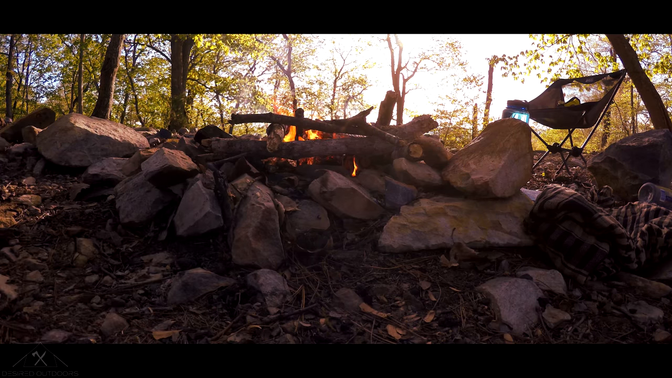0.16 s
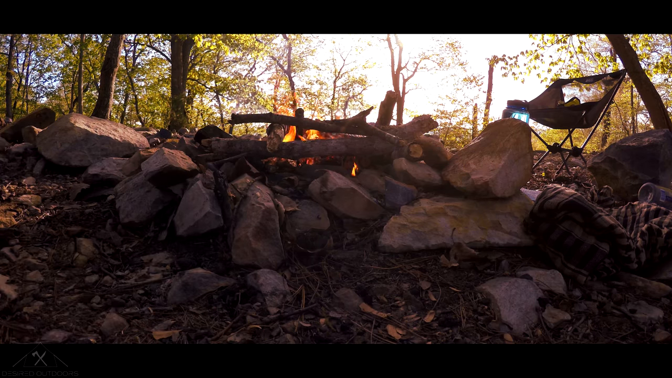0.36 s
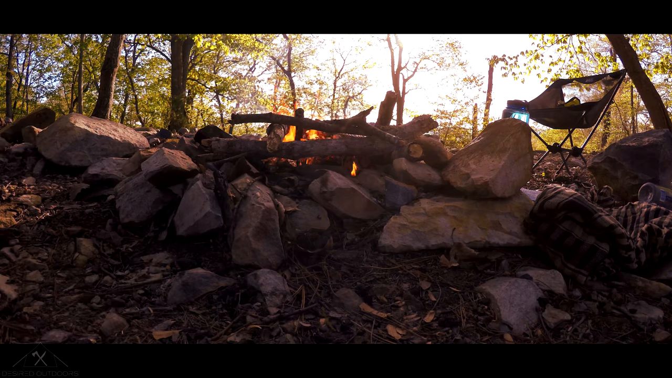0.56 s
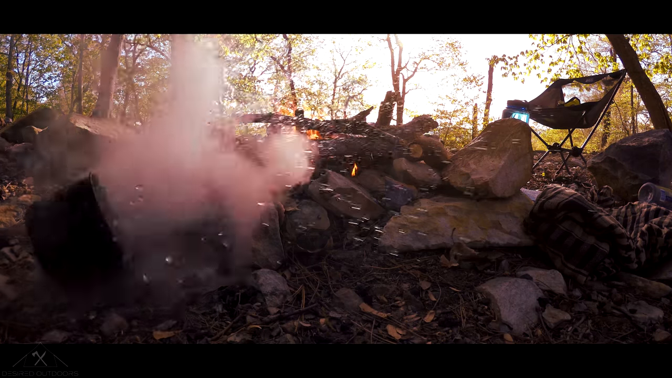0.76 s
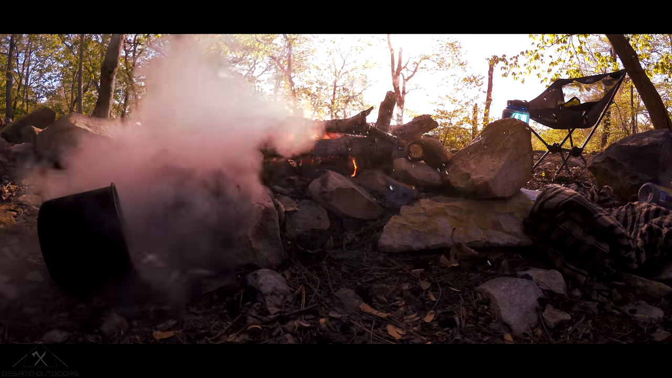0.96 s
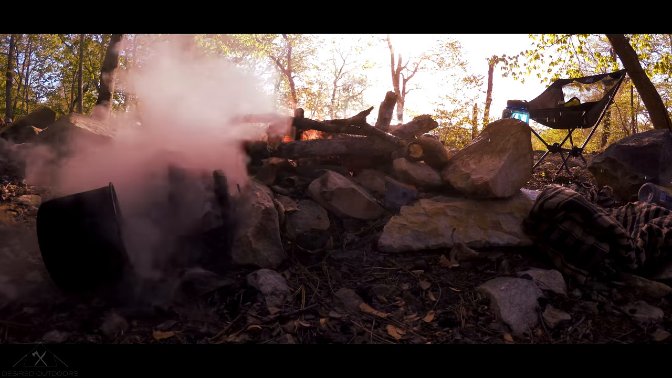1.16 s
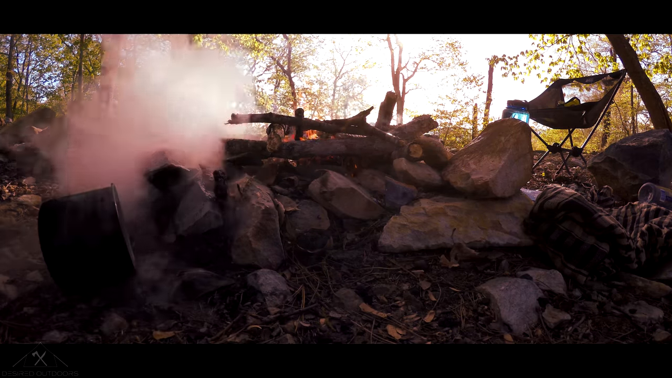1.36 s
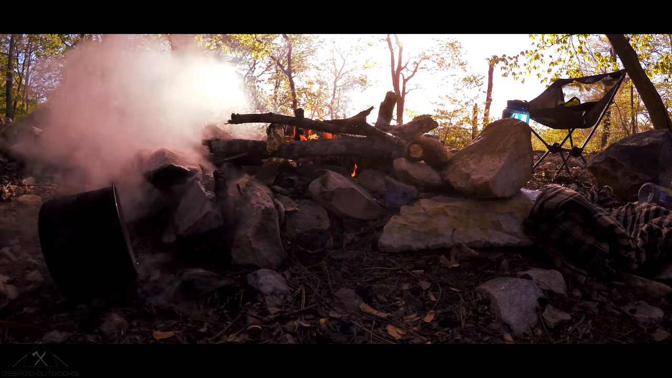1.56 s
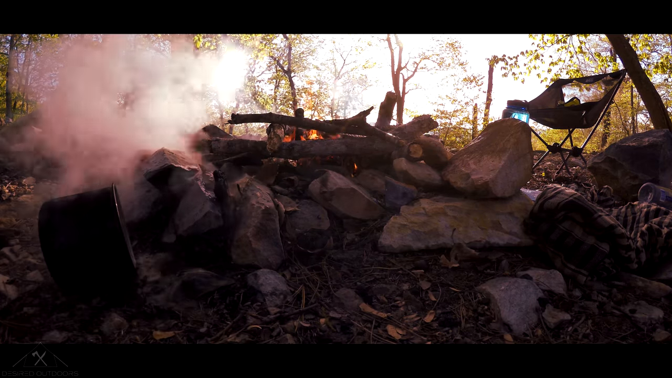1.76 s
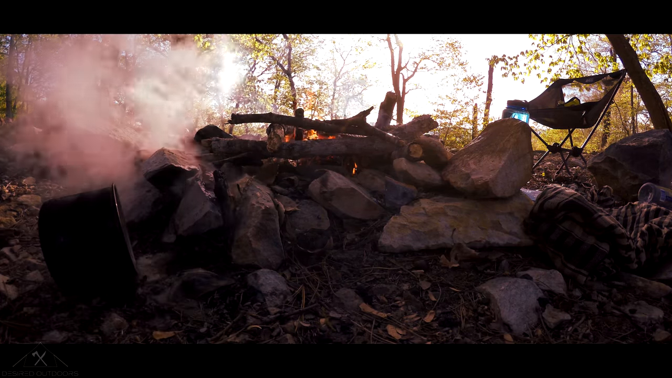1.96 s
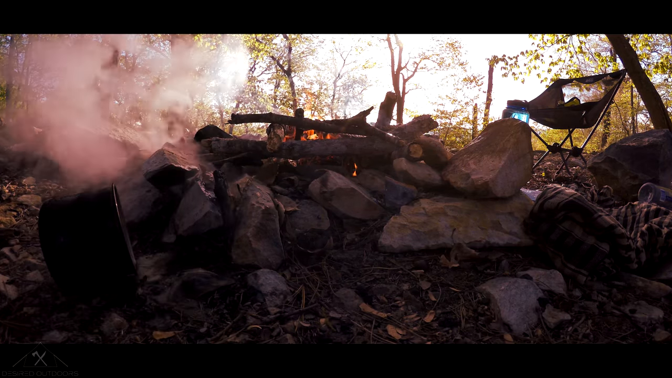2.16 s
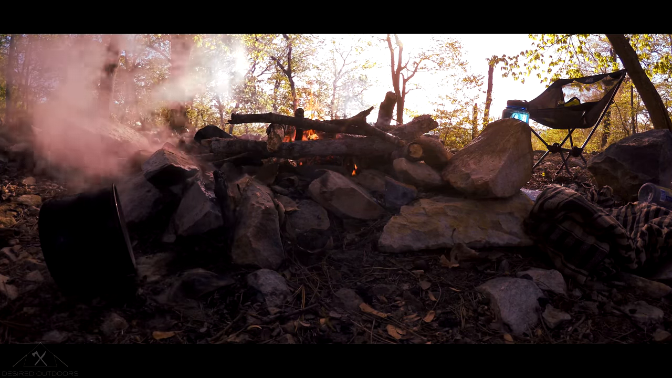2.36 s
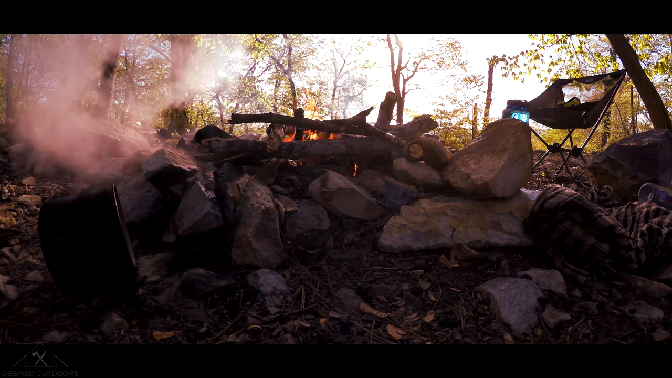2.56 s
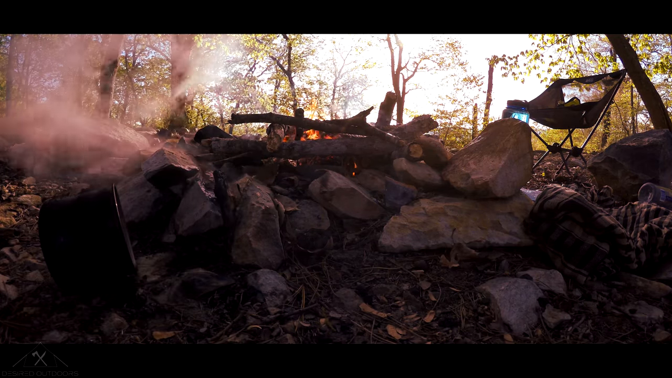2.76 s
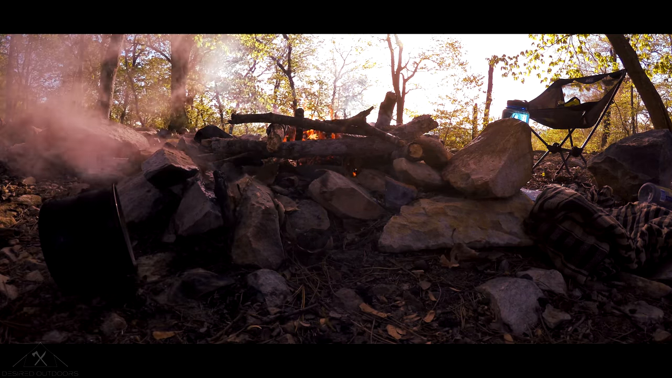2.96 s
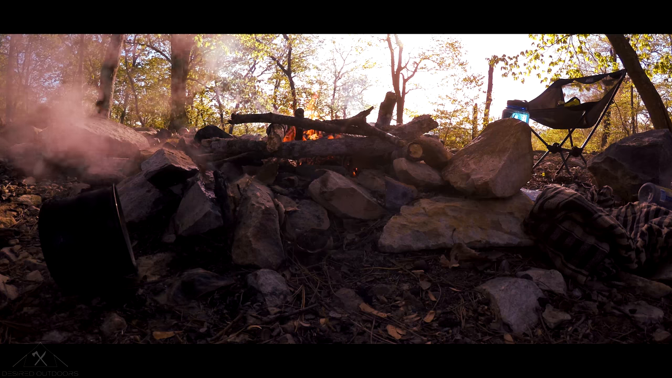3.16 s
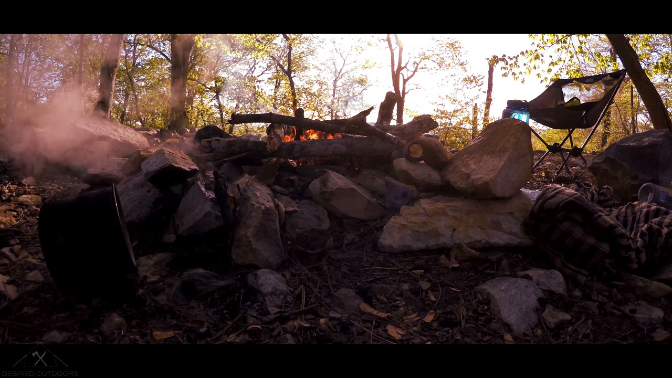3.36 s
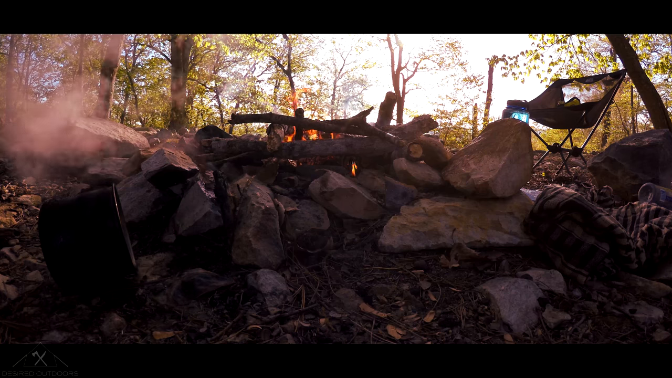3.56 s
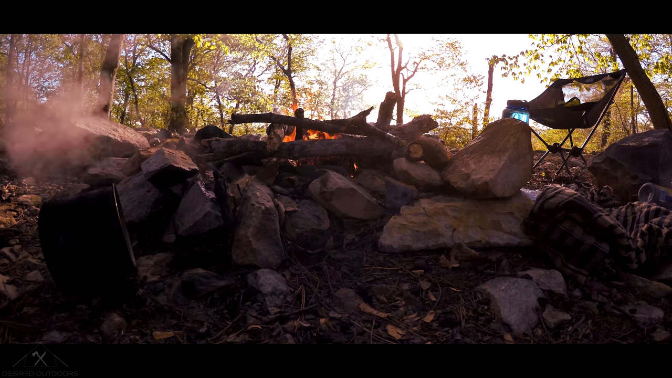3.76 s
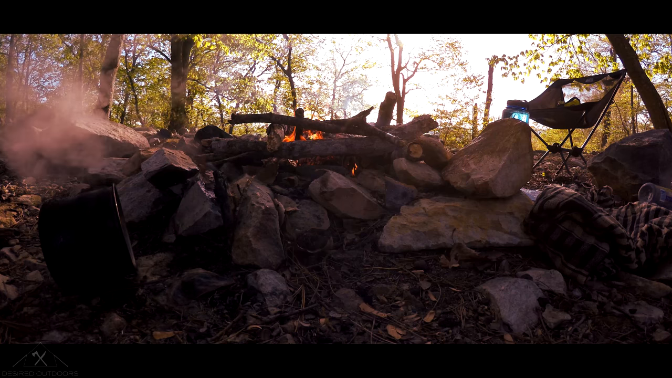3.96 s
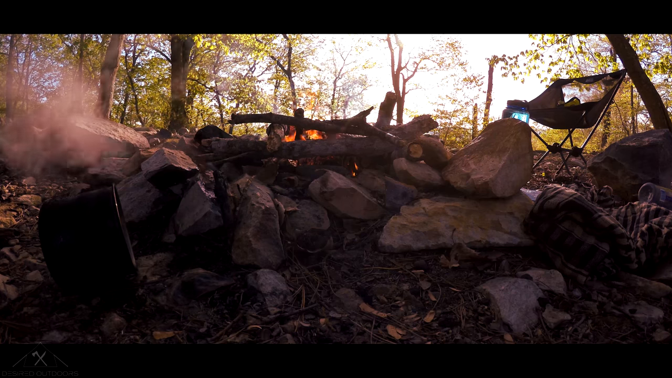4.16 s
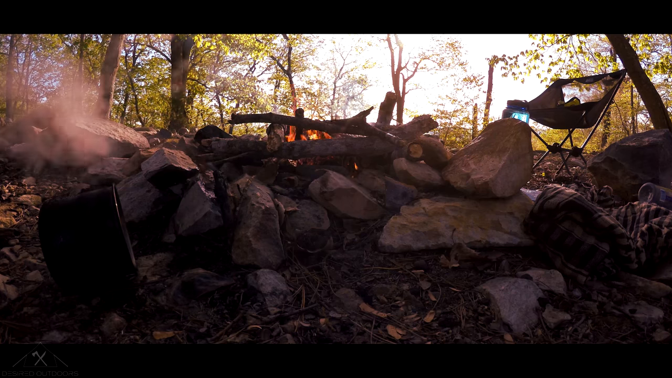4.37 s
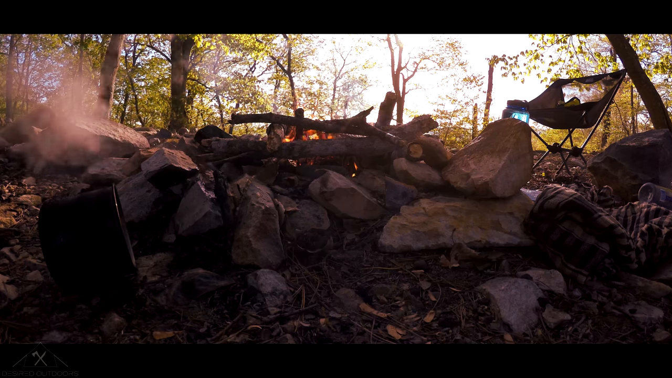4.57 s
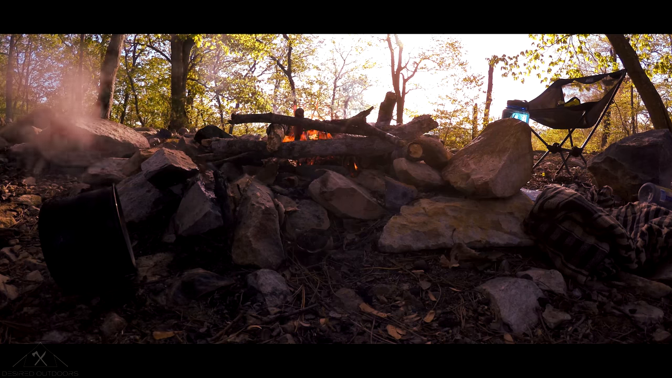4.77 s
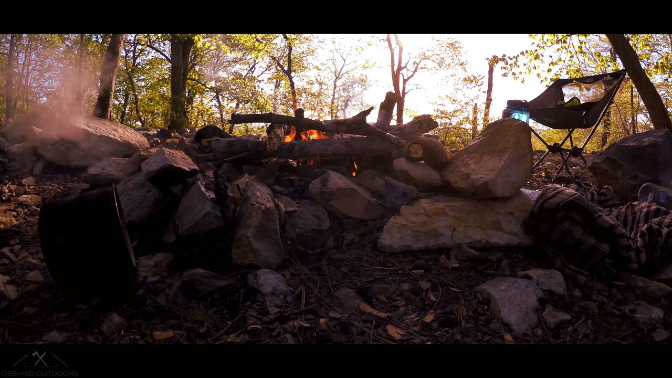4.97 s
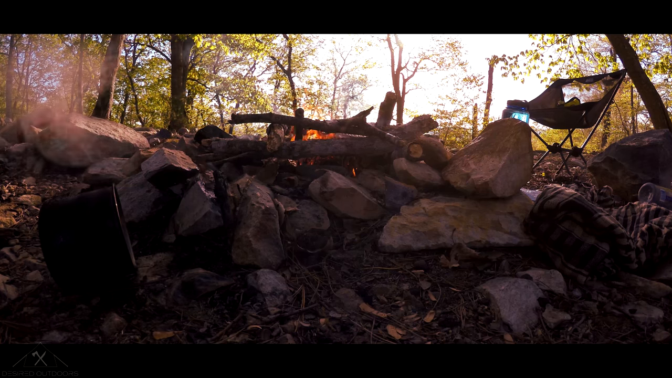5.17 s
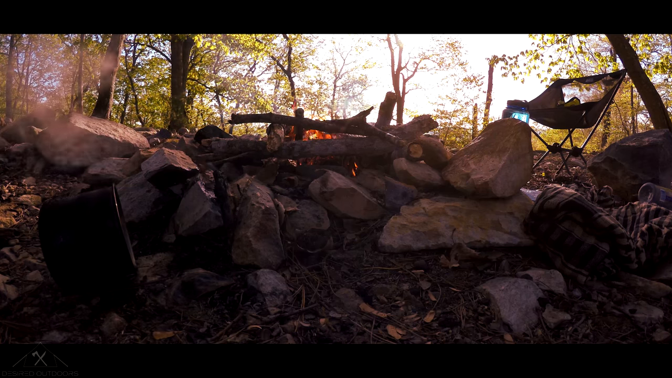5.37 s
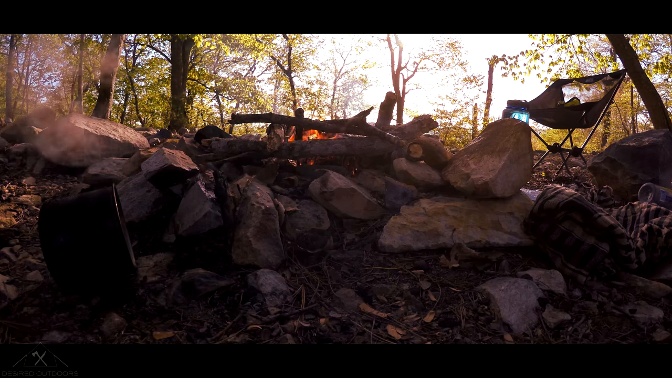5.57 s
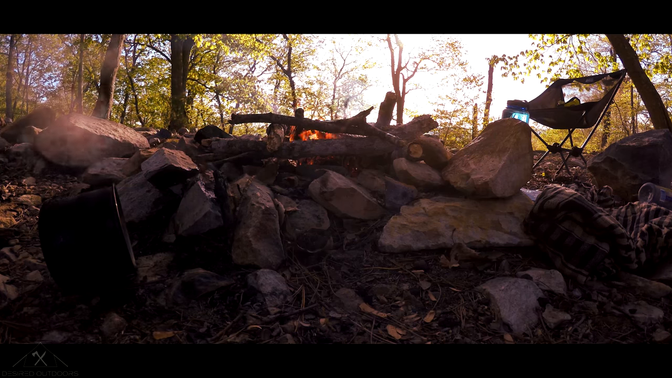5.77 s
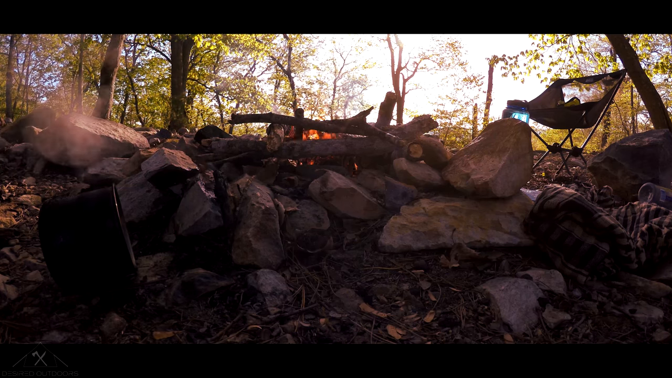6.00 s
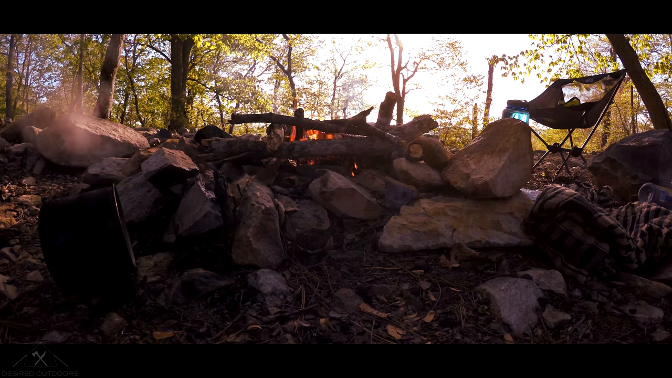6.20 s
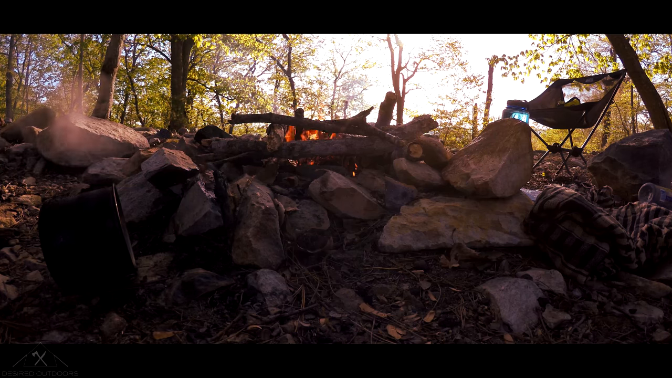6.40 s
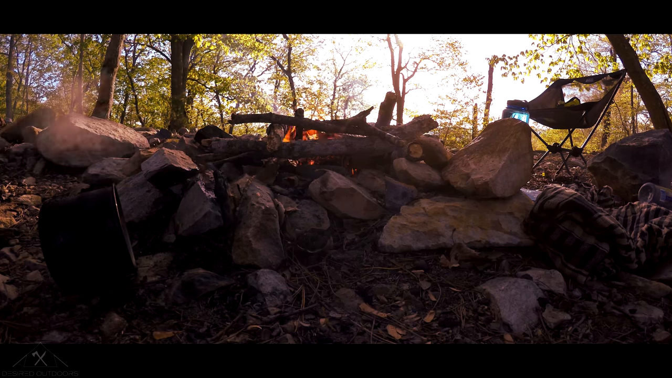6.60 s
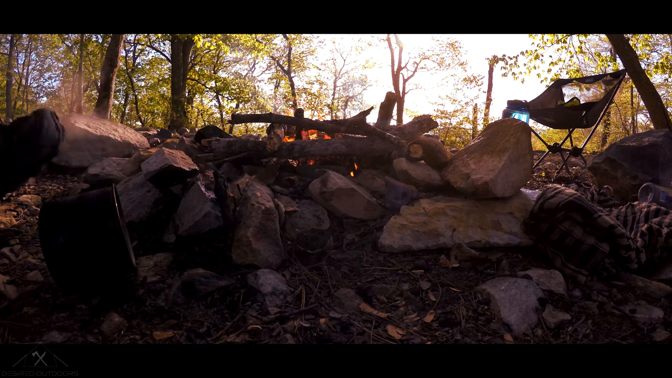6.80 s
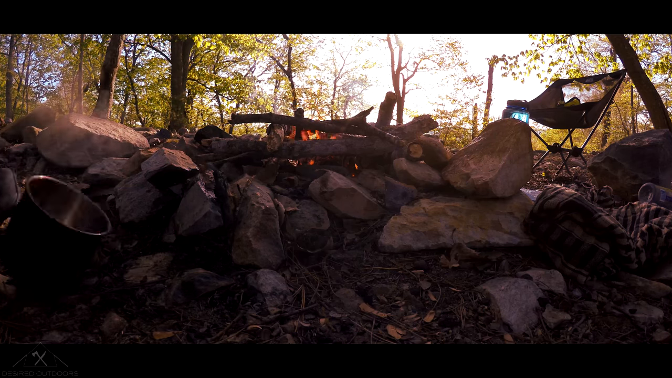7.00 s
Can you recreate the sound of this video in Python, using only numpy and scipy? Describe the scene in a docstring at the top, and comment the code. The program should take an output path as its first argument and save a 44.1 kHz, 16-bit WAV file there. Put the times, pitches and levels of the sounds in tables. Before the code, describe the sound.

Water spills onto hot campfire coals with a rising, spitting hiss, and a metal pot hits stone with one loud, dull crack. Steam sizzles on in ever weaker surges as the water sloshes inside the pot. Then the fire ticks softly, wood knocks, and the pot scrapes briefly on stony ground. The sounds are close, outdoors in the woods, over faint birds and a far traffic rumble.

```python
"""At a campfire in the woods, a pot of water slips. Water runs over the rim and flashes to steam on the coals,
then the pot cracks onto the ring of stones and rings in its damped modes. The water sloshes on, wetting
the hot wall in ever weaker bursts of sizzle: steam noise and the puffs of bursting droplets. The fire
ticks, wood knocks, leaves rustle, and at the end the pot is tipped and grates over the stony ground.
Behind it all are gusts of wind, far traffic, a droning engine and faint birds."""
import sys
import numpy as np
from scipy import signal
from scipy.fft import rfft, irfft
from scipy.io import wavfile
from scipy.ndimage import map_coordinates

SR = 44100
rng = np.random.default_rng(int(sys.argv[2]) if len(sys.argv) > 2 else 0)


def dump_mix(stems):
    """Bounce the given channels to the path in sys.argv[1] as a 16-bit WAV at rate SR."""
    frames = np.atleast_2d(stems).T  # one column per channel
    limited = np.clip(frames, -1, 1)  # hard clip at full scale
    pcm = np.round(limited * 32767).astype(np.int16)
    wavfile.write(sys.argv[1], SR, pcm)


N = 310464
TIME = np.arange(N) / SR

# Water running over the rim onto the coals. Each row: time in seconds, flow level in dB.
POURING = [(0.3, -54.5), (0.35, -44.5), (0.40, -37), (0.47, -34), (0.52, -36), (0.68, -31.5), (0.76, -36),
           (0.85, -38), (0.91, -73)]
# Swings of the water against the hot wall.
# Each row: start in seconds, time on the wall in seconds, flow level in dB, drying in dB per second.
SLOSHES = [(0.958, 0.26, -39, 68), (1.39, 0.26, -40, 160), (1.819, 0.26, -41.6, 180),
           (2.266, 0.24, -43, 220.5), (2.712, 0.21, -45, 223), (3.157, 0.19, -48, 300),
           (3.626, 0.15, -50.5, 340)]
# The state of the boil. Each row: time in seconds, puffs per second, their level in dB relative to
# the steady steam, share from 0 to 1 that boils inside the pot.
BOILING = [(0.3, 2500, -5, 0.03), (1.25, 1240, -3, 0), (1.6, 330, -5, 0.29), (2.4, 310, -1, 0.66),
           (2.8, 400, -7, 0.94), (3.8, 530, -11, 1)]
# Air resonances of the open pot. Each row: frequency in Hz, bandwidth in Hz, gain in dB.
POT_AIR = [(687, 76, 4), (794.8, 37, 3), (910, 14, 0.5), (980, 22, -5.5), (2550, 110, 2), (2880, 65, -0.5),
           (3880, 99, -1.5), (4230, 130, 3), (5700, 77, 2), (6420, 380, 1), (7596, 180, 4.5),
           (8650, 420, 4), (9260, 180, 2), (12743, 1400, -7.5)]
# Reflections off the pot wall and the stones. Each row: delay in seconds, gain as a factor.
ECHOES = [(0.00165, 0.2), (0.0031, -0.17), (0.0054, 0.2)]
# Spectra of steam on the coals, steam in the pot and water hitting the ground.
# Each row: frequency in Hz, relative level in dB.
COAL_STEAM = [(240, -27), (450, -4), (700, 3.5), (950, 1.5), (1300, -7.5), (1700, -2.5), (2400, -3),
              (3000, 0), (4000, -2), (5000, -1.5), (5900, -1.5), (8800, -5.5), (10500, -9.5),
              (15000, -14.5)]
POT_STEAM = [(300, -22), (480, -7.5), (1000, -8), (1200, -22), (1800, -14.5), (2200, -18.5), (2500, -7.5),
             (4000, -3.5), (5000, -3.5), (6000, -2), (9600, -2.5), (10800, -6.5), (13200, -3), (15000, -10)]
SPLASH_SPECTRUM = [(70, -16), (160, 2), (300, 1), (480, -1), (900, -21.5)]
# The first gush turning to spray. One row: centre in seconds, half-width in seconds, level in dB.
FLASH = (0.474, 0.014, -28.5)
# Big drops bursting on hot metal. Each row: start in seconds, relative level in dB.
SPITS = [(0.425, -20), (0.4676, -15.5), (0.472, -12.5), (0.5793, -17), (0.8625, -19), (0.903, -18),
         (0.985, -20.5), (1.2191, -19.5), (1.4132, -18), (1.4216, -18), (1.4422, -23), (1.6132, -17),
         (1.635, -23), (1.892, -18.5), (2.0337, -17), (2.0518, -24), (2.443, -25.5), (2.4872, -23),
         (2.9158, -33), (3.3314, -29)]
# Gulps plopping onto the coals. Each row: start in seconds, relative level in dB, starting pitch in Hz.
GULPS = [(0.428, -32.5, 1207), (0.462, -29.5, 959.6), (0.474, -26, 1005), (0.495, -27, 918.5),
         (0.544, -27.5, 612), (0.580, -26, 518), (0.615, -27.5, 831.6), (0.644, -28, 880),
         (0.665, -29.5, 1073), (0.795, -32, 1020), (0.862, -30.5, 850)]
# Larger spills slapping the ground. Each row: loudest moment in seconds, level in dB.
SPILLS = [(0.575, -46), (1.21, -44)]
# The first trickle singing on the embers. Each row: time in seconds, level in dB.
TRICKLE_LEVEL = [(0, -61), (0.07, -55), (0.13, -60), (0.2, -52), (0.32, -50.5), (0.42, -50), (0.55, -91)]
# Resonances of its steam jet. Each row: frequency in Hz, bandwidth in Hz, gain in dB.
TRICKLE_PEAKS = [(1250, 280, -0.5), (2700, 190, -6), (4530, 220, -9.5), (5100, 400, -6), (5870, 160, -1),
                 (7255, 380, -9)]
# Steam squeaking through a crack.
# Each row: start and length in seconds, first and last pitch in Hz, level in dB.
SQUEAKS = [(0.018, 0.022, 5040, 5850, -55.5), (0.057, 0.02, 6900, 7670, -52),
           (0.116, 0.034, 5100, 6010, -53.5), (0.158, 0.024, 6950, 8010, -50.5),
           (0.218, 0.024, 5390, 5900, -51), (0.262, 0.018, 7250, 7950, -49.5),
           (0.825, 0.035, 3300, 3150, -38), (3.4, 0.22, 6100, 6450, -70), (3.41, 0.21, 7900, 7970, -68)]

# Blows of the pot on stone. Each row: start in seconds, relative levels of clash, thud and ring in dB.
LANDING_BLOWS = [(0.7109, -4.5, -12, -12), (0.7162, -11, 4.5, -16.5), (0.7184, -14, -14, -23),
                 (0.7405, -23.5, -43, -42)]
# Jerks of the pot over the ground. Each row: start in seconds, relative levels of grit and bump in dB.
DRAG_JERKS = [(6.9405, -45, -35.5), (6.9435, -45, -54), (6.956, -38.5, -53), (6.9765, -46, -53),
              (6.9885, -43, -60), (7.001, -58, -44.5), (7.0065, -47, -57), (7.019, -46, -53),
              (7.03, -51, -41)]
# Spectra of the rim's clash, the body's thud and the grit. Each row: frequency in Hz, relative level in dB.
CLASH_SPECTRUM = [(180, -35.5), (300, -0.5), (1040, -8), (2650, -23), (3490, -6), (4120, -9), (4770, 0),
                  (7420, -6.5), (8460, -5.5), (11900, -8), (15000, -18.5)]
THUD_SPECTRUM = [(40, -8), (120, -9.5), (170, 1), (270, 5.5), (450, -2), (750, 0.5), (1050, -5),
                 (1400, -24), (2000, -1), (2450, -2.5), (3200, -19.5), (8000, -33.5)]
GRIT_SPECTRUM = [(710, -44.5), (1200, -5.5), (2240, -8), (2510, -9), (4000, -8), (4310, -9), (4790, -5),
                 (7010, -3.5), (15000, -3.5)]
# Modes of the pot, of the yielding soil and of a dull bump before the pot is tipped.
# Each row: frequency in Hz, relative level in dB, time to fall 60 dB in seconds.
POT_MODES = [(256, -14, 0.045), (506, -6.5, 0.038), (677, -6.5, 0.062), (773, 0, 0.085), (836, -3.5, 0.064),
             (970, -4.5, 0.018), (1083, -7, 0.033), (2060, -15, 0.03), (3276, -20.5, 0.17),
             (3800, -17.5, 0.03), (4560, -8.5, 0.045), (5080, -9, 0.042), (5020, -10.5, 0.025),
             (4830, -10.5, 0.058), (5356, -15.5, 0.055), (5860, -16, 0.02), (5720, -11, 0.05),
             (6630, -7, 0.05), (6200, -8.5, 0.095), (6160, -9, 0.05), (7560, -15.5, 0.071),
             (9189, -12.5, 0.07), (11600, -20.5, 0.045)]
SOIL_MODES = [(68, -2, 0.082), (183, -2.5, 0.014), (270, 2, 0.017)]
CLACK_MODES = [(423, -16, 0.014), (680, -10, 0.03), (828, -5.5, 0.026), (1246, 0.5, 0.014),
               (1770, -9, 0.013), (2400, -8, 0.013), (3500, -12, 0.014)]
# Resonances of the scraping pot. Each row: frequency in Hz, bandwidth in Hz, gain in dB.
SCRAPE_RING = [(2570, 51, 5), (4350, 64, 9), (5450, 64, 5), (5720, 70, 3.5), (6940, 250, 4), (8100, 57, 3),
               (9140, 59, 2), (9600, 60, 0), (10210, 64, 2)]

# The soft hiss of the fire. Each row: time in seconds, relative level in dB.
EMBER_LEVEL = [(0, -69.5), (2.6, -64.5), (5, -66), (7.04, -65)]
# Bands in which sap fizzes in the logs. Each row: frequency in Hz, bandwidth in Hz, gain in dB.
SAP_FIZZ = [(8400, 1393, -3), (13200, 1200, -8)]
# Loud ticks and dry knocks of the wood. Each row: start in seconds, peak in dB, centre frequency in Hz.
TICKS = [(0.0518, -38, 12000), (1.79, -27.5, 4800), (3.0574, -41, 13020), (3.5428, -40, 7910),
         (3.851, -45, 8290), (3.901, -27, 9000), (3.9181, -27, 12080), (5.2045, -29.5, 12380),
         (5.448, -42, 6750), (5.6473, -39, 13400), (5.8616, -45.5, 6500), (6.028, -39, 8000),
         (6.352, -42, 8400), (6.434, -44, 3960), (6.5768, -44, 6000), (6.8075, -36.5, 6910)]
KNOCKS = [(3.851, -50, 1505), (3.900, -48, 1400), (3.918, -43.5, 1500), (5.205, -45, 1896),
          (5.961, -41, 1800), (6.209, -46.5, 1394), (6.233, -49, 800), (6.332, -40.5, 697),
          (6.532, -48, 1496)]
# Swells of rustling leaves and of wind. Each row: centre in seconds, half-width in seconds, level in dB.
RUSTLES = [(6.256, 0.04, -62), (6.5, 0.0894, -67.5)]
GUSTS = [(0.1, 0.13, -37), (0.684, 0.18, -41), (1.487, 0.24, -35), (3.541, 0.25, -37), (4.097, 0.18, -41.5),
         (5.251, 0.18, -52.5), (6.951, 0.11, -48.5)]
# Spectra of the embers, dry leaves and far traffic. Each row: frequency in Hz, relative level in dB.
EMBER_SPECTRUM = [(530, -37.5), (900, -5), (1020, -7), (1100, -14.5), (1410, -6), (1870, -4.5),
                  (2660, -3.5), (3780, -6), (8230, -7.5), (10800, -12), (15000, -11)]
LEAF_SPECTRUM = [(300, -10), (700, 4), (1400, 1), (2500, -5), (4000, -8), (7000, 0), (10000, -6),
                 (15000, -16)]
TRAFFIC_SPECTRUM = [(25, -13), (50, -4.5), (80, -4), (120, -9), (155, -8), (210, -7), (340, -9.5),
                    (470, -13.5), (740, -22.5), (1500, -33.5), (3000, -61.5)]
# The rumble of far traffic. Each row: time in seconds, level in dB.
TRAFFIC_LEVEL = [(0, -58), (4.3, -60), (6.3, -57), (7.04, -57.5)]
# Partials of a far engine. Each row: frequency in Hz, levels at the start and at the end in dB.
ENGINE_PARTIALS = [(69, -66, -59.5), (73.4, -71, -60.5), (120, -70, -64.5), (208, -95, -63)]
# Far bird calls. Each row: start and length in seconds, first and last pitch in Hz, relative level in dB.
BIRD_CALLS = [(3.9, 0.18, 2850, 2700, -70), (4.44, 0.17, 2547, 2690, -73), (5.36, 0.12, 2650, 3820, -70),
              (5.53, 0.16, 4200, 3100, -70), (5.62, 0.11, 1940, 2240, -74), (5.8, 0.12, 1864, 2067, -75),
              (6.0, 0.22, 1950, 2054, -76), (6.42, 0.2, 2150, 1945, -79)]

USUAL_FLOW_DB = -42.5   # reference flow for the balance of the sizzle and the level of the patter


def water_flow(wetting_s=0.038, soaked_s=0.75, cooling_db_per_s=11.5, dry_s=3.93, fade_s=0.21):
    """Independent sources add in power: pour, sloshes and simmering coals give the boiling one gain."""
    power = (from_db(in_time(POURING)[0]) * during(POURING, fade_s=0.12)) ** 2
    for start, hold_s, db, drying_db_per_s in SLOSHES:
        wetted = np.clip((TIME - start) / wetting_s, 0, 1)
        boiling_off = from_db(db - drying_db_per_s * np.maximum(TIME - start - hold_s, 0))
        power = power + (wetted * boiling_off) ** 2
    simmer = from_db(-42 - cooling_db_per_s * (TIME - soaked_s)) * (TIME > soaked_s)
    water_left = np.clip((dry_s - TIME) / fade_s, 0, 1)
    return np.sqrt(power + (simmer * water_left) ** 2)


def boil(per_s, puff_db, flutter_db=2.4, puff_t60=0.0026):
    """Vaporisation gives continuous steam noise plus shot noise, a puff per bursting droplet; rms 1."""
    puff_decay = from_db(-120 * seconds(SR // 200) / puff_t60)   # in power, hence twice 60 dB
    puff_power = signal.fftconvolve(grains(per_s, spread_db=4.5) ** 2, puff_decay)[:N]
    steam = noise() * from_db(flutter_db * drift(30))
    puffs = rms_one(np.sqrt(np.abs(puff_power)) * noise())
    puff_gain = from_db(puff_db)
    return (steam + puff_gain * puffs) / np.sqrt(1 + puff_gain ** 2)


def shifting_gaps(steam, depth_db, width_hz=700, hold_s=0.042):
    """Spectral modulation: steam leaves through shifting gaps, so its colour flickers."""
    hz, times, frames = signal.stft(steam, SR, nperseg=512)
    field = rng.standard_normal((256, 1024))
    grid = np.meshgrid(hz / width_hz, times / hold_s, indexing="ij")
    gain_db = depth_db * map_coordinates(field, grid, order=3, mode="wrap")
    return signal.istft(frames * from_db(gain_db), SR, nperseg=512)[1][:N]


def sizzle(flow):
    """Boiling noise moves from the open coals into the pot, where cavity resonance and echoes colour it."""
    per_s, puff_db, inside = in_time(BOILING)
    inside = np.clip(inside, 0, 1)
    coals = shifting_gaps(colour(boil(per_s, puff_db), COAL_STEAM), depth_db=2.5)
    hollow = cut(resonate(boil(per_s, puff_db), POT_AIR), 310, "high")
    wall = shifting_gaps(colour(boil(per_s, puff_db), POT_STEAM), depth_db=2.0)
    pot = wall + from_db(7) * hollow
    pot = pot + sum(gain * np.roll(pot, int(delay * SR)) for delay, gain in ECHOES)
    # Much water splutters low; a thin film sprays high.
    excess_db = 20 * np.log10(flow + 1e-9) - USUAL_FLOW_DB
    splutter = from_db(-5.5 + 0.02 * np.minimum(excess_db, 0) + 1.2 * drift(9.2))
    spray = from_db(-4 - 0.4 * np.maximum(excess_db, -3))
    out = 0
    for gain, coal_band, pot_band in zip([splutter, 1, spray], three_bands(coals), three_bands(pot)):
        out = out + gain * (np.sqrt(1 - inside) * rms_one(coal_band) + np.sqrt(inside) * rms_one(pot_band))
    return out * flow * from_db(-1.5)


def flash():
    """Flash boiling: the first gush meets the embers in one short, very bright puff."""
    return rms_one(cut(noise(), 7000, "high")) * swells([FLASH])


def churn(start_db=-41, fall_db_per_s=30):
    """Cavity resonance: water stirred by the landing excites the air in the pot, then settles."""
    since = TIME - LANDING_BLOWS[0][0]
    hollow = resonate(grains(900, spread_db=2.5), POT_AIR)
    settling = from_db(start_db - fall_db_per_s * np.abs(since)) * (since > 0)
    return rms_one(cut(hollow, [550, 1200], "band")) * settling


def spits():
    """Sudden vaporisation bursts big drops on hot metal, each with a sharp puff."""
    times, levels_db = np.transpose(SPITS)
    return colour(bursts(times, levels_db - 7, t60=0.012), COAL_STEAM)


def gulps(rise=0.12, t60=0.045):
    """Bubble resonance: each gulp traps air that rings briefly, rising in pitch."""
    out, t = np.zeros(N), seconds(SR // 16)
    for start, db, hz in GULPS:
        tone = np.sin(2 * np.pi * hz * t * (1 + rise * t / t60))
        roughness = 1 + 2 * cut(rng.standard_normal(len(t)), 900, "low")
        add(out, start, decay(db - 1.5, t60, t) * tone * roughness)
    return out


def splash(flow, usual_db=-58, limit_db=-55, rise_db_per_s=100, fall_db_per_s=129):
    """Impact noise: drops patter on the ground, in step with the flow and harder at each spill."""
    level = np.minimum(from_db(usual_db) * (flow / from_db(USUAL_FLOW_DB)) ** 1.8, from_db(limit_db))
    for peak_s, db in SPILLS:
        below_peak_db = np.maximum(rise_db_per_s * (peak_s - TIME), fall_db_per_s * (TIME - peak_s))
        level = np.hypot(level, from_db(db - below_peak_db))
    return colour(grains(660, spread_db=2.0), SPLASH_SPECTRUM) * level


def trickle():
    """Jet noise: a narrow stream of steam sings at a few resonances over a broad hiss."""
    singing = cut(resonate(noise(), TRICKLE_PEAKS), 10000, "low")
    hiss = from_db(-22) * cut(noise(), [500, 8000], "band")
    return rms_one(singing + hiss) * from_db(in_time(TRICKLE_LEVEL)[0]) * during(TRICKLE_LEVEL)


def squeaks():
    """Flow-excited tones: steam whistles unsteadily through a crack."""
    return glides(SQUEAKS, waver=0.02)


def pot_ring(times, levels_db):
    """Modal vibration: each blow excites the pot's water-damped modes with random sign and strength."""
    out, t = np.zeros(N), seconds(SR // 4)
    hz, mode_db, t60 = np.transpose(POT_MODES)[:, :, None]
    for start, blow_db in zip(times, levels_db):
        db = blow_db + mode_db + rng.normal(0, 1, hz.shape)
        signs = rng.choice([-1, 1], hz.shape)
        add(out, start, np.sum(signs * damped_sine(hz, db, t60, t), axis=0))
    return out


def landing():
    """Impact excitation: the rim clashes and rattles on stone, then the pot's weight thumps the soil."""
    times, clash_db, thud_db, ring_db = np.transpose(LANDING_BLOWS)
    push = bursts(times, thud_db - 7.5, t60=0.017)   # a brief roar at each blow
    soil = np.zeros(N)
    thump = sum(damped_sine(hz, db, t60, seconds(SR // 4)) for hz, db, t60 in SOIL_MODES)
    for start, db in zip(times, thud_db):
        add(push, start, from_db([db + 18.5]))   # the weight arrives as a single impulse
        add(soil, start, from_db(db - 18.5) * thump)
    clash = bursts(times, clash_db, t60=0.022)
    rattle = bursts(times, clash_db - 20, t60=0.09)
    ring = pot_ring(times, ring_db + 2)
    return colour(clash + rattle, CLASH_SPECTRUM) + colour(push, THUD_SPECTRUM) + ring + soil


def drag():
    """Stick-slip friction: the pot jerks over grit, rings and bumps hollowly."""
    times, grit_db, bump_db = np.transpose(DRAG_JERKS)
    dull_ring = cut(pot_ring(times, bump_db - 9), 1400, "low")
    bumps = bursts(times, bump_db + 14, t60=0.065)
    hollow = resonate(bumps, [(186, 73, 4), (300, 70, 1), (710, 43, -8), (900, 20, 0.5)])
    grit = colour(bursts(times, grit_db - 4, t60=0.072), GRIT_SPECTRUM)
    return grit + from_db(3.5) * resonate(grit, SCRAPE_RING) + dull_ring + hollow


def clack(start=6.7348):
    """Heavy damping: a hard tick and short-lived modes make a dull bump before the pot is tipped."""
    out, t = np.zeros(N), seconds(SR // 16)
    for k, (hz, db, t60) in enumerate(CLACK_MODES):
        add(out, start, (-1) ** k * damped_sine(hz, db - 21.5, t60, t))
    add(out, start, from_db(-29) * snap(7000, breadth=0.79, t60=0.022, scatter_db=-11))
    return out


def fire(faint_ticks_per_s=11, livens_at_s=4.4):
    """Combustion noise: embers hiss and crackle, sap fizzes, and the wood ticks and knocks in pulses."""
    crackle_bands = [(hz, hz / 2, 0) for hz in np.geomspace(4500, 13000, num=4)]
    crackle = sum(resonate(grains(22, spread_db=4.0), [band]) for band in crackle_bands)
    hiss = from_db(-0.5) * colour(noise(), EMBER_SPECTRUM)
    fizz = resonate(grains(1500, spread_db=2.5), SAP_FIZZ)
    out = (hiss + fizz + from_db(-6.5) * rms_one(crackle)) * from_db(in_time(EMBER_LEVEL)[0])
    for start, db, hz in TICKS:
        add(out, start, from_db(db) * snap(hz, breadth=1.0, t60=0.012, scatter_db=-9.5))
    for start, db, hz in KNOCKS:
        add(out, start, from_db(db) * snap(hz, breadth=0.4, t60=0.028, scatter_db=-16.5))
    faint_onsets = (rng.random(N) < faint_ticks_per_s / SR) * (TIME > livens_at_s)
    faint_peaks = faint_onsets * from_db(-52.5 + 2.2 * noise())
    faint_tick = snap(9000, breadth=0.55, t60=0.0055, scatter_db=-13.5)
    return out + signal.fftconvolve(faint_peaks, faint_tick)[:N]


def rustle():
    """Granular noise: dry leaves crush as someone shifts on the ground."""
    return colour(grains(700, spread_db=3.0), LEAF_SPECTRUM) * swells(RUSTLES)


def birds():
    """Far calls are gliding tones whose scattered sound is about as strong as the direct sound."""
    return woods(glides(BIRD_CALLS, waver=0.065), wet_db=1, t60=0.25) * from_db(-6)


def wind(calm_db=-54):
    """Turbulent pressure: gusts nudge the microphone, mostly below the range of hearing."""
    pressure = cut(cut(noise(), 9.8, "low", order=3), 5, "high")
    return rms_one(pressure) * (from_db(calm_db) + swells(GUSTS))


def traffic():
    """Low frequencies carry farthest, so distant traffic arrives as a rumble."""
    return colour(noise(), TRAFFIC_SPECTRUM) * from_db(in_time(TRAFFIC_LEVEL)[0])


def engine():
    """Beating: the two lowest partials of a far engine interfere, and the drone grows as it draws nearer."""
    out = 0
    for hz, start_db, end_db in ENGINE_PARTIALS:
        phase = 2 * np.pi * np.cumsum(hz * (1 + 0.003 * drift(2))) / SR
        level = from_db(np.linspace(start_db, end_db, N) + 1.1 * drift(1.2))
        out = out + np.sqrt(2) * np.sin(phase) * level
    return out


def woods(x, wet_db, t60=0.4):
    """Scattering from the trunks adds a thin, dull reverberation."""
    t = seconds(SR)
    scatter = cut(rng.standard_normal(SR), [300, 5000], "band", order=1)
    tail = scatter * decay(0, t60, t) * np.minimum(t / 0.018, 1)
    return x + from_db(wet_db) * signal.fftconvolve(x, tail / np.linalg.norm(tail))[:N]


def snap(hz, breadth, t60, scatter_db):
    """An impulse and its short scatter off the stones excite one broad resonance; peak 1."""
    t = seconds(SR // 16)
    pulse = rng.standard_normal(len(t)) * decay(scatter_db, t60, t)
    pulse[0] = 1
    sound = resonate(pulse, [(min(hz, 0.33 * SR), hz * breadth, 0)])
    return sound / np.abs(sound).max()


def glides(rows, waver):
    """Frequency modulation: short tones sweep linearly and waver at random."""
    out, wobble = np.zeros(N), drift(400)
    for start, length_s, first_hz, last_hz, db in rows:
        progress = np.linspace(0, 1, int(length_s * SR))
        unsteady = 1 + waver * np.roll(wobble, -int(start * SR))[:len(progress)]
        hz = (first_hz + (last_hz - first_hz) * progress) * unsteady
        envelope = from_db(db) * np.sin(np.pi * progress)
        add(out, start, envelope * np.sin(2 * np.pi * np.cumsum(hz) / SR))
    return out


def bursts(times, levels_db, t60):
    """Transient noise jumps up at each time and decays exponentially."""
    envelope, t = np.zeros(N), seconds(SR // 4)
    for start, db in zip(times, levels_db):
        add(envelope, start, decay(db, t60, t))
    return envelope * noise()


def grains(per_s, spread_db):
    """Shot noise: random clicks, many small and a few large; rms 1."""
    sizes = from_db(spread_db * np.minimum(rng.exponential(1, N), 4)) * rng.choice([-1, 1], N)
    return rms_one(sizes * (rng.random(N) < per_s / SR))


def noise():
    """White Gaussian noise."""
    return rng.standard_normal(N)


def drift(rate_hz):
    """A smooth random fluctuation with a spread near 1."""
    knots = rng.standard_normal(4096)
    return np.interp(TIME * rate_hz * 2, np.arange(len(knots)), rms_one(knots))


def colour(x, spectrum, size=4096):
    """A minimum-phase filter imposes the spectrum and conserves the power of white noise."""
    hz, db = np.transpose(spectrum)
    bin_hz = np.arange(size // 2 + 1) * SR / size
    gain = from_db(np.interp(np.log(bin_hz + 1), np.log(hz), db))
    cepstrum = irfft(np.log(gain))
    cepstrum[1:size // 2] *= 2   # folding onto positive time makes the filter causal
    cepstrum[size // 2 + 1:] = 0
    response = irfft(np.exp(rfft(cepstrum)))
    return signal.fftconvolve(x, response / np.linalg.norm(response))[:N]


def resonate(x, peaks):
    """Two-pole resonators in parallel. Each row: frequency in Hz, bandwidth in Hz, gain in dB."""
    out = 0
    for hz, width_hz, db in peaks:
        radius = np.exp(-np.pi * width_hz / SR)
        forward = np.array([1, 0, -1]) * (1 - radius ** 2) / 2
        feedback = [1, -2 * radius * np.cos(2 * np.pi * hz / SR), radius ** 2]
        out = out + from_db(db) * signal.lfilter(forward, feedback, x + 1e-18)
    return out


def cut(x, hz, kind, order=2):
    """A maximally flat low-, high- or band-pass filter."""
    sections = signal.butter(order, np.clip(hz, 5, 0.45 * SR), kind, fs=SR, output="sos")
    return signal.sosfilt(sections, x + 1e-18)


def three_bands(x):
    """A zero-phase crossover separates the splutter, sizzle and spray ranges."""
    low = signal.sosfiltfilt(signal.butter(4, 2000, fs=SR, output="sos"), x)
    high = signal.sosfiltfilt(signal.butter(4, 8500, "high", fs=SR, output="sos"), x)
    return low, x - low - high, high


def damped_sine(hz, db, t60, t):
    """The free vibration of one mode."""
    return decay(db, t60, t) * np.sin(2 * np.pi * hz * t)


def decay(db, t60, t):
    """Exponential decay from a level in dB, falling 60 dB in t60 seconds."""
    return from_db(db - 60 * t / t60)


def swells(rows):
    """A sum of Gaussian envelopes."""
    return sum(from_db(db) * np.exp(-((TIME - centre) / half_s) ** 2) for centre, half_s, db in rows)


def in_time(rows):
    """Each column of a curve, interpolated sample by sample."""
    times, *columns = np.transpose(rows)
    return [np.interp(TIME, times, column) for column in columns]


def during(rows, fade_s=0.04):
    """A gate: 1 while a curve lasts, fading to 0 outside it."""
    return np.clip(1 + np.minimum(TIME - rows[0][0], rows[-1][0] - TIME) / fade_s, 0, 1)


def add(out, start, sound):
    """Superpose a short sound at a start time in seconds."""
    i = min(max(round(start * SR), 0), N - 1)
    out[i:i + len(sound)] += sound[:N - i]


def seconds(samples):
    """A time axis of so many samples."""
    return np.arange(samples) / SR


def from_db(db):
    """Decibels to amplitude ratio."""
    return 10 ** (np.asarray(db) / 20)


def rms_one(x):
    """Scale to rms 1."""
    return x / np.sqrt(np.mean(x ** 2) + 1e-20)


def scene():
    """Superposition: all sources sum at one point on the ground, the near ones with little scatter."""
    flow = water_flow()
    water = sizzle(flow) + flash() + churn() + spits() + gulps() + splash(flow) + trickle() + squeaks()
    near = water + landing() + drag() + clack() + fire() + rustle()
    calls = birds()
    return (woods(near, wet_db=-36.5) + calls + wind() + traffic() + engine())[None]


def record(dry, cutoff_hz=15250):
    """Overload clips the crack at full scale; a steep low-pass then cuts the highest treble."""
    low_pass = signal.ellip(10, 0.1, 70, cutoff_hz, fs=SR, output="sos")
    return signal.sosfilt(low_pass, np.clip(dry, -1, 1))


dry = scene()
out = record(dry)
dump_mix(out)
```